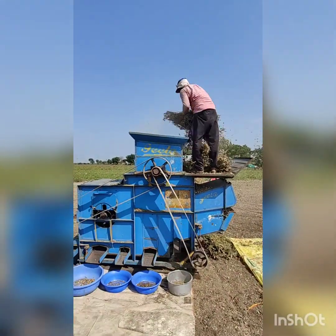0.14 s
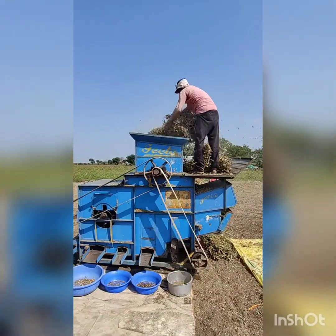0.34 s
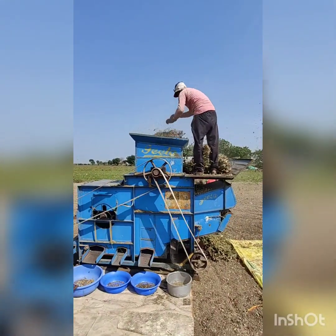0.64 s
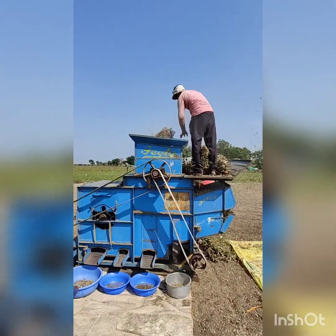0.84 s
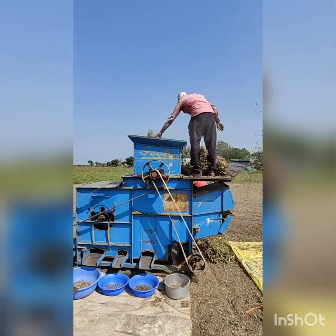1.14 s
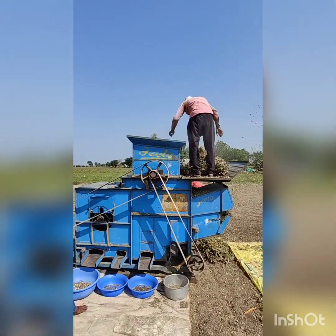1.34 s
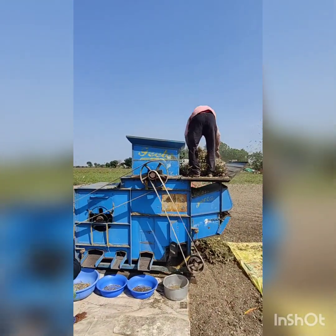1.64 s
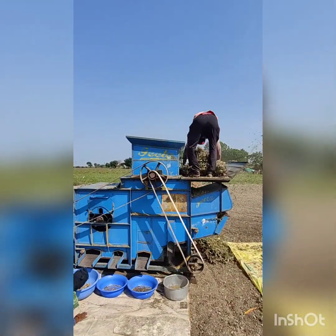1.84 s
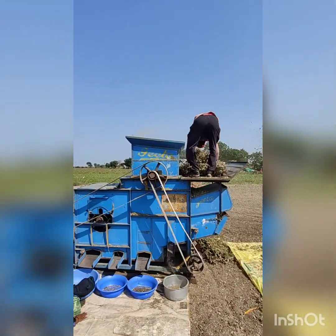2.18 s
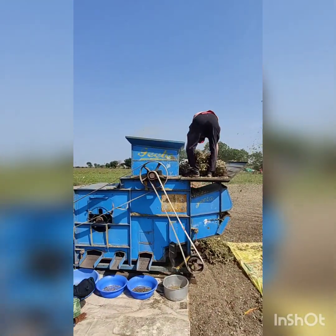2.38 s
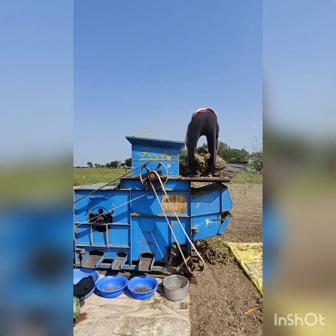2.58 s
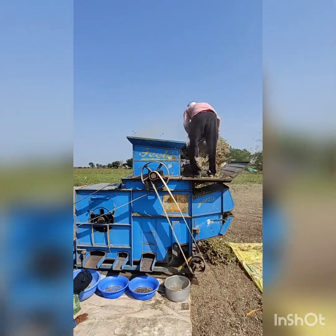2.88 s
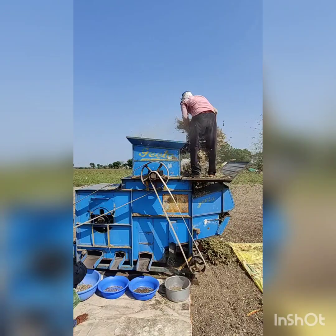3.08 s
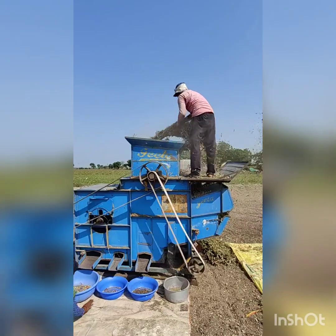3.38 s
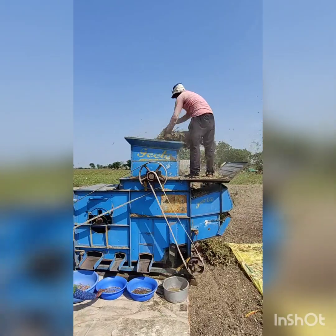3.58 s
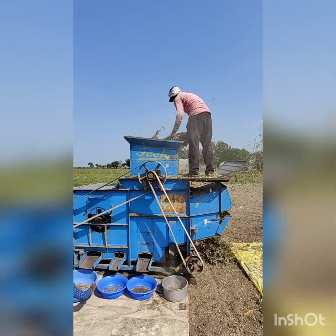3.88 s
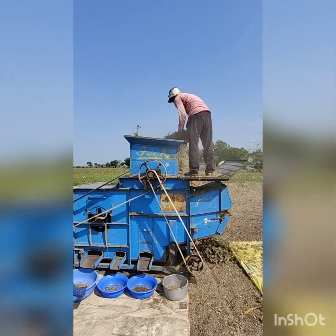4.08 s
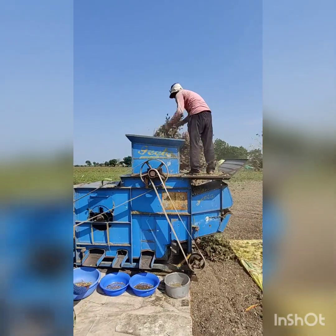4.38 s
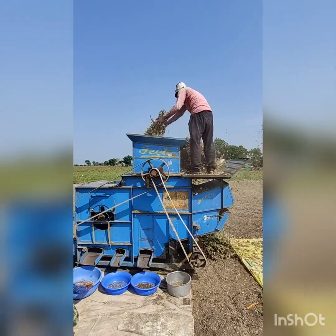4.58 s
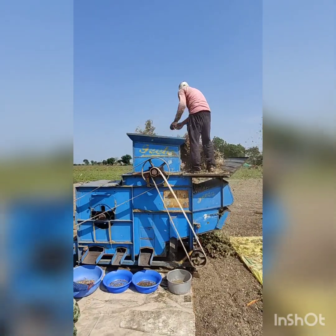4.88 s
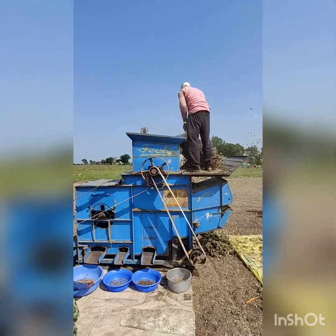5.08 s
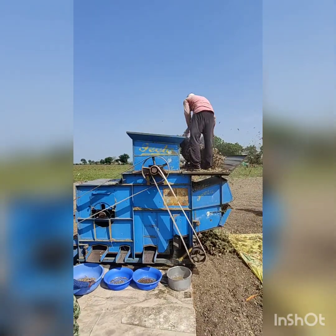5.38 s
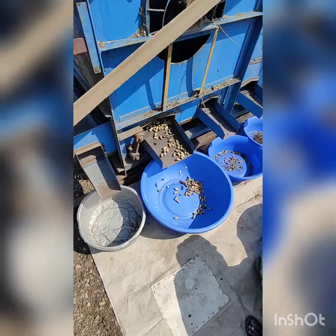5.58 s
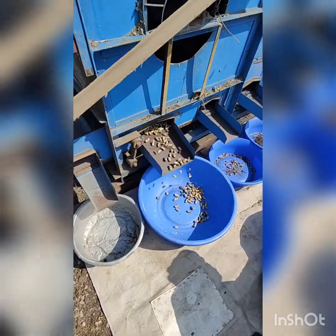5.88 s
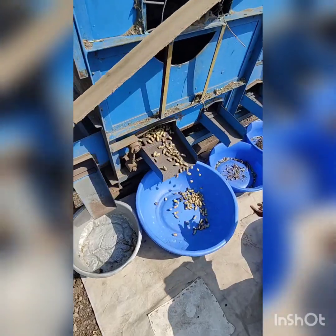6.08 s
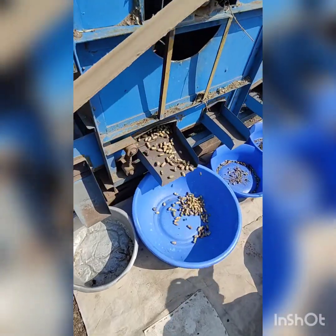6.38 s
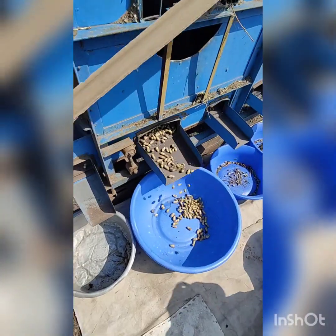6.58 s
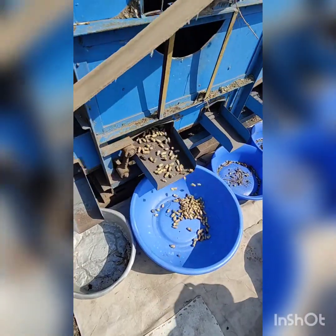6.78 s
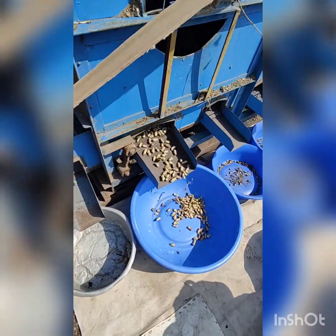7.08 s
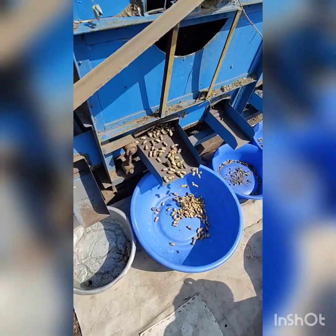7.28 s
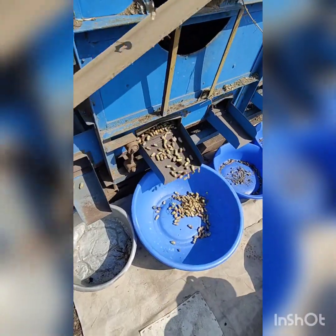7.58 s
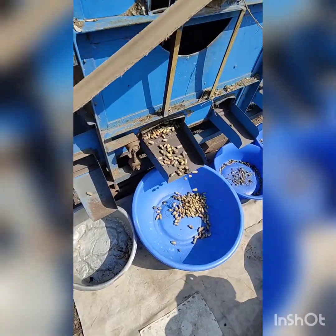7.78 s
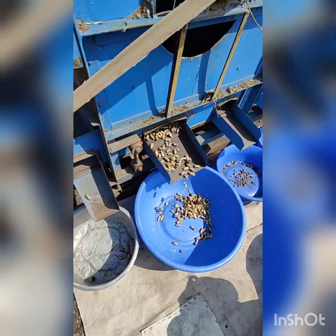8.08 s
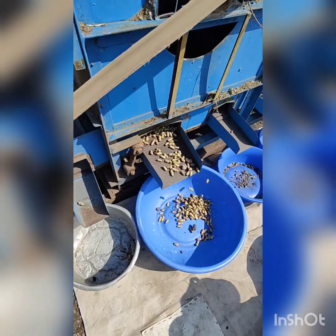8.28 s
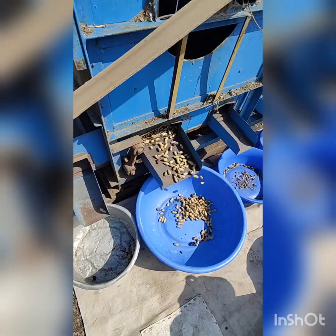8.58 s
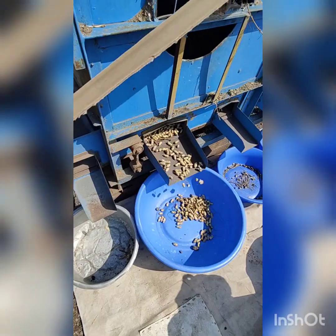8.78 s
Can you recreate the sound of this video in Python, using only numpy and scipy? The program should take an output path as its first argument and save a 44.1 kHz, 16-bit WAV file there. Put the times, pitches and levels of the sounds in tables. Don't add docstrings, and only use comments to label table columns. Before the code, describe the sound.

From 0 to 5.5 seconds a thresher is heard from afar across an open field. A slow single-cylinder engine pops evenly, nearly five times per second, each pop with a breathy gas jet and low thump. Just before each, the belt gives a tiny high chirp. Under this lie a grainy drum roar, bright chaff hiss, sieve rattle and a low fan hum swelling and fading about every two seconds. The belt joint clacks on metal roughly every 0.4 seconds, and a stronger chaff puff comes near 4.6. At 5.5 the sound cuts out for under a quarter second. From 5.7 it returns beside the chute, clearly louder and closer, with harder pops, sharper clacks and pod knocks near 6.2, 7.1 and 7.5. Wind rumbles at 5.7-6.5 and gusts strongest around 7.1-7.4. The roar thins slightly toward 8.3, while the chugging continues to the end at about 8.9.

```python
import sys
import numpy as np
from scipy import signal
from scipy.fft import rfft, irfft, next_fast_len
from scipy.io import wavfile
from scipy.ndimage import uniform_filter1d, map_coordinates

SR = 44100
rng = np.random.default_rng(int(sys.argv[2]) if len(sys.argv) > 2 else 0)


def transcribe(signal):
    frames = np.atleast_2d(signal).T
    limited = np.clip(frames, -1, 1)
    pcm = np.round(limited * 32767).astype(np.int16)
    wavfile.write(sys.argv[1], SR, pcm)


def to_linear_factor(level_db):
    exponent = np.asarray(level_db, float) / 20
    return 10 ** exponent


N = 394236

MOVE_S = 5.6
# time_s, gain_db
MUTE = [
    (5.4965, -0.5),
    (5.497, -60),
    (5.53, -90),
    (5.64, -92),
    (5.655, -45),
    (5.72, -6),
    (5.9, 0),
]

# freq_hz, level_db (per Hz)
WIND_LEVEL = [(0, -39), (0.75, -34.5), (1.2, -40.5), (1.45, -32.5), (1.8, -36), (2.05, -44), (2.5, -36.5),
              (3.25, -39), (3.5, -34), (3.95, -36), (5.5, -41.5), (5.7, -30.5), (6.2, -29.5), (6.98, -40),
              (7.1, -23.5), (7.36, -25.5), (7.52, -36), (8.94, -34)]
WIND_COLOUR = [(13, -33), (22, 2), (70, 9), (178, -2), (252, -8.5), (300, -10), (390, -37), (660, -120)]

# multiple, level_db
FAN_ORDERS = [
    (1, 2),
    (2, -7.5),
    (3, -7),
    (4, -10),
]
FAN_HZ = 45.17
BEAT_START_S, BEAT_S, BEAT_ORDER_DB = .3, 2.05, -2

# delay_s (after a firing), level_db
JOLTS = [
    (0.045, -5),
    (0.123, -14.5),
    (.178, -8.5),
]

# time_s, level_db
CROP_LOAD = [
    (0, -39.5),
    (1.5, -38),
    (2.3, -38),
    (2.7, -39),
    (5.5, -38),
    (5.7, -28.5),
    (6.5, -29.5),
    (7.3, -31),
    (8.3, -33),
    (8.94, -32.5),
]
# freq_hz, level_db (per Hz)
DRUM_ROAR = [
    [(71, -14.5), (120, -7), (264, -3.5), (449, -10), (715, -7.5), (925, -11), (1320, -11.5), (1520, -17.5), (1940, -13.5), (2760, -18.5), (4400, -20), (5600, -27), (7280, -52), (12300, -120)],
    [(71, -51), (120, -4), (225, -3), (394, -9.5), (639, -6.5), (787, -12), (1240, -13), (1470, -19.5), (1730, -16.5), (2940, -20.5), (4190, -21.5), (5600, -31.5), (7280, -61), (12300, -120)],
]
# freq_hz, level_db (per Hz)
CHAFF_HISS = [
    [(2940, -24), (5000, -15.5), (5860, -15.5), (6390, -1), (7030, 0.5), (8980, -5.5), (12300, -7), (13900, -4.5), (15200, -4.5), (15800, -12.5)],
    [(2940, -33), (5000, -13), (5830, -16), (6480, -2.5), (7100, -1), (9020, -10.5), (12300, -11.5), (13600, -6.5), (15200, -8.5), (15800, -11)],
]
HISS_UNDER_ROAR = [-4, -6.5]
# time_s, gain_db, half_width_s
CHAFF_PUFFS = [
    (1.48, 1, 0.068),
    (4.578, 4.5, 0.071),
    (6.0, 1.5, 0.12),
    (7.3, 3, 0.077),
    (8.94, 1.5, 0.26),
]

# start_s, peak_db, ring_hz
JOINT_CLACKS = [(0.0166, -20, 4630), (0.4626, -24, 2370), (0.875, -21.5, 4700), (1.3271, -17.5, 2300),
                (1.74, -18.5, 4660), (2.1954, -21.5, 2340), (2.613, -23.5, 3760), (3.0688, -25, 2440),
                (3.486, -25, 4530), (3.943, -19.5, 2230), (4.8155, -20.5, 2320), (5.2338, -19.5, 4400),
                (5.683, -10.5, 2190), (6.103, -10, 2620), (7.4274, -10.5, 4200), (7.8423, -17, 4490),
                (8.2928, -14.5, 4300), (8.7094, -15.5, 2570)]
GUARD_RING = [-12, -4.5]
LAP_START_S, LAP_S = .25, .87
# start_s, peak_db
POD_HITS = [(0.5327, -33), (0.741, -25.5), (3.237, -36), (4.204, -31), (4.282, -34), (6.2047, -22),
            (6.2951, -31), (7.1392, -20), (7.503, -23), (8.132, -29.5), (8.6844, -37), (8.8064, -29)]
POD_HZ, POD_BRIGHT_DB = 2300, -10
# freq_hz, level_db (per Hz)
CLACK_CRACK = [(900, -17), (2000, -0.5), (3000, 3.5), (4500, 2), (5700, -10), (6800, -0.5), (8500, -7),
               (12000, -14.5), (15900, -17)]
# freq_hz, level_db (per Hz)
BELT_SCUFF = [(4000, -39.5), (4800, -2.5), (5500, -0.5), (6200, 0), (7200, 3), (8500, -35)]
SLIP_LEAD = [.004, .006]
SLIP_BASE_HZ, SLIP_LEAD_S_PER_KHZ2, SLIP_LENGTH_S = 5030, .002, .009

# start_s, strength_db, slip_db, slip_pitch_hz
FAR_FIRINGS = [(0.1526, -26.5, -37, 5470), (0.3628, -27.5, -26.5, 5800), (0.5712, -27, -38, 6385),
               (0.7801, -26.5, -40, 7470), (0.9902, -27, -30, 5360), (1.1974, -25.5, -28, 6350),
               (1.406, -25, -37, 6320), (1.6147, -25.5, -30.5, 5380), (1.825, -27, -35, 6550),
               (2.0338, -27.5, -29, 6340), (2.2424, -27, -35, 7600), (2.4533, -27, -32, 6600),
               (2.6638, -26.5, -29.5, 5580), (2.873, -26, -40, 7160), (3.083, -29, -35, 7260),
               (3.2935, -28.5, -39, 6500), (3.5037, -29.5, -37, 6400), (3.7144, -27, -31, 7040),
               (3.9256, -26, -35, 6440), (4.1354, -26, -32, 6750), (4.3461, -26, -30, 5700),
               (4.5592, -27, -32, 6370), (4.7688, -28, -32, 5800), (4.9797, -26.5, -28.5, 5420),
               (5.1909, -26.5, -27.5, 6940), (5.4024, -25.5, -32.5, 5580)]
# start_s, strength_db, slip_db, slip_pitch_hz
NEAR_FIRINGS = [(5.708, -18.5, -38, 6770), (5.9164, -14.5, -32, 7390), (6.127, -18, -24, 6300),
                (6.3366, -17.5, -37, 7300), (6.547, -17.5, -33.5, 7060), (6.7565, -17.5, -23, 6900),
                (6.966, -17, -21.5, 5640), (7.175, -18, -26.5, 7500), (7.3853, -18, -28.5, 6750),
                (7.5951, -20, -25, 5560), (7.8026, -19.5, -26.5, 5550), (8.0126, -18, -30.5, 6470),
                (8.2214, -18, -28.5, 5520), (8.4298, -20, -27.5, 5700), (8.638, -18.5, -24.5, 5800),
                (8.8463, -19.5, -27, 5800)]
ALL_FIRINGS = FAR_FIRINGS + NEAR_FIRINGS
# delay_s, size
POP_ECHOES = [
    [(0, 1), (.00305, .8), (.0103, .35)],
    [(0, 1), (.00305, .45), (.0043, .72), (.0076, .55), (.0108, .25), (.0152, .3)],
]
# ring_hz, level_db, t60_s
SILENCER = [
    (241, -14.5, .07),
    (685, -16, 0.039),
    (1120, -19, .03),
]
# freq_hz, level_db (per Hz)
GAS_JET = [
    [(410, -37.5), (700, -3), (1410, -4), (1860, -1), (2820, -11), (4750, -7), (5700, -8), (7020, 0.5), (8540, -10.5), (9600, -6.5), (12100, -10.5), (13500, -8.5), (15800, -19.5)],
    [(410, -9.5), (700, -5.5), (1880, -1), (2230, -5), (3170, -11), (4510, -4), (5410, -13), (7210, 3.5), (8760, -10.5), (9730, -8.5), (12300, -11), (13500, -5.5), (15800, -11.5)],
]
# freq_hz, level_db (per Hz)
GAS_TAIL = [(400, -34), (900, 4.5), (1800, -2.5), (3000, -1.5), (5000, -14), (8000, -37.5)]
POP_LEAD_S = .002


def unit(x):
    return x / np.sqrt(np.mean(x ** 2) + 1e-20)


def curves(rows):
    s, *cols = np.transpose(rows)
    return [np.interp(np.arange(N) / SR, s, c) for c in cols]


def wobble(rate):
    return map_coordinates(rng.standard_normal(int(N * rate / SR) + 4), [np.arange(N) * rate / SR])


def coloured(x, spectrum):
    m = next_fast_len(N + 8192)
    f, db = np.transpose(spectrum)
    gain = to_linear_factor(np.interp(np.log(np.fft.rfftfreq(m, 1 / SR) + 1), np.log(f + 1), db))
    return unit(irfft(rfft(x, m) * gain, m)[:N])


def by_place(x, spectra):
    far, near = coloured(x, spectra[0]), coloured(x, spectra[1])
    return np.where(np.arange(N) < MOVE_S * SR, far, near)


def patchy(patchy_db, size=512):
    z = signal.stft(rng.standard_normal(N), nperseg=size)[2]
    field = uniform_filter1d(rng.standard_normal(z.shape), 6 * size // 512 + 1, 0)
    field = uniform_filter1d(field, 6, 1)
    return signal.istft(z * to_linear_factor(patchy_db * unit(field)), nperseg=size)[1][:N]


def add(track, s, sound):
    part = track[max(round(s * SR), 0):][:len(sound)]
    part += sound[:len(part)]


def bump(t, centre, width):
    return np.exp(-.5 * ((t - centre) / width) ** 2)


def wind():
    rumble = coloured(patchy(1.1) * to_linear_factor(2.5 * wobble(16)), WIND_COLOUR)
    return to_linear_factor(curves(WIND_LEVEL)[0]) * rumble


def fan():
    t = np.arange(N) / SR
    near = t > MOVE_S
    beat = np.abs(np.sin(np.pi * (t - BEAT_START_S) / BEAT_S))
    swell = np.where(near, to_linear_factor(-34), to_linear_factor(-42.5) * beat)
    turn = 2 * np.pi * np.cumsum(FAN_HZ * (1 + 0.004 * wobble(3.07))) / SR
    hum = np.zeros(N)
    for k, level in FAN_ORDERS:
        order_db = level + ~near * (k - 1) * BEAT_ORDER_DB
        hum += to_linear_factor(order_db + 1.1 * k * wobble(4)) * np.sin(k * turn)
    return to_linear_factor(1.5) * swell * hum


def rattle(rate, spread_db):
    hits = (rng.random(N) < rate / SR) * to_linear_factor(spread_db * np.minimum(rng.exponential(size=N), 2))
    return signal.fftconvolve(hits, to_linear_factor(-60 * np.arange(2000) / SR / 0.017))[:N]


def sieve():
    out, t = np.zeros(N), np.arange(SR // 25) / SR
    for s, *_ in ALL_FIRINGS:
        for lag, db in JOLTS:
            jolt_db = db + 4 * rng.standard_normal()
            add(out, s + lag - .02, to_linear_factor(jolt_db) * bump(t, 0.022, 0.0026))
    return out


def drum():
    t = np.arange(N) / SR
    roar_db = curves(CROP_LOAD)[0]
    hiss_db = roar_db + np.where(t > MOVE_S, HISS_UNDER_ROAR[1], HISS_UNDER_ROAR[0])
    for s, db, width in CHAFF_PUFFS:
        hiss_db = hiss_db + db * bump(t, s, width)
    shake = 0.81 * wobble(40)
    knocks = 1 + .36 * (rattle(70, 0.85) + sieve())
    roar = by_place(patchy(1.1) * to_linear_factor(1.5 * shake) * knocks, DRUM_ROAR)
    hiss = by_place(patchy(1.1) * to_linear_factor(1.4 * shake) * knocks, CHAFF_HISS)
    return to_linear_factor(roar_db + 1.48) * roar + to_linear_factor(hiss_db + 1.1) * hiss


def clacks():
    out, crack, t = np.zeros(N), np.zeros(N), np.arange(SR // 20) / SR
    strikes = [(s, db, POD_HZ, POD_BRIGHT_DB) for s, db in POD_HITS]
    for s, db, hz in JOINT_CLACKS:
        at_engine = (s - LAP_START_S) / LAP_S % 1 < .5
        strikes.append((s, db, hz, GUARD_RING[int(at_engine)]))
    rise = 1 - np.exp(-t / 0.00051)
    for s, db, hz, bright_db in strikes:
        drift = np.cumsum(rng.standard_normal((2, len(t))), axis=1) * 0.13
        plate = to_linear_factor(-5) * np.sin(2 * np.pi * hz * t + drift[0])
        guard = to_linear_factor(bright_db + 5) * np.sin(2 * np.pi * 6750 * t + drift[1])
        ping = np.sin(2 * np.pi * hz * t)
        add(out, s, to_linear_factor(db - 6.5 - 60 * t / 0.061) * rise * (plate + guard))
        add(out, s - .001, to_linear_factor(db - 8.5 - 60 * t / 0.025) * rise * ping)
        add(crack, s, to_linear_factor(db - 6.5 - 60 * t / 0.044) * rise)
    grit = to_linear_factor(2.4 * wobble(700)) * rng.standard_normal(N)
    return out + crack * coloured(grit, CLACK_CRACK)


def belt_slip():
    out, scuff, t = np.zeros(N), np.zeros(N), np.arange(SR // 20) / SR
    for s, _, db, hz in ALL_FIRINGS:
        long, rub = rng.standard_normal(2)
        drift = np.cumsum(rng.standard_normal(len(t))) * 0.13
        flutter = to_linear_factor(2.7 * np.sin(2 * np.pi * 310 * t + drift))
        lead = SLIP_LEAD[int(s > MOVE_S)] + SLIP_LEAD_S_PER_KHZ2 * ((hz - SLIP_BASE_HZ) / 1000) ** 2
        length = SLIP_LENGTH_S * to_linear_factor(1.5 * long)
        squeal = np.sin(2 * np.pi * hz * (t + 1.2 * (t - .025) ** 2) + drift)
        add(out, s - lead - .025, to_linear_factor(db) * flutter * bump(t, 0.026, length / 2.5) * squeal)
        add(scuff, s - .025, to_linear_factor(db - 7 + 2.1 * rub) * bump(t, 0.023, 0.0068))
    grit = to_linear_factor(2.4 * wobble(700)) * rng.standard_normal(N)
    return out + scuff * coloured(grit, BELT_SCUFF)


def pressure_front(t, at):
    undershoot = .45 * bump(t, at + .0008, .00035)
    returned = .8 * bump(t, at + .0021, .0004)
    return bump(t, at, .00032) - undershoot - returned


def engine():
    pops, breath, tail, t = np.zeros(N), np.zeros(N), np.zeros(N), np.arange(SR // 8) / SR
    for s, jet_db, *_ in ALL_FIRINGS:
        near = int(s > MOVE_S)
        chance = rng.standard_normal(8)
        pop_db = jet_db - .4
        pop = np.zeros(len(t))
        for (lag, size), c in zip(POP_ECHOES[near], chance):
            pop += size * to_linear_factor(c) * pressure_front(t, POP_LEAD_S + lag)
        thump = to_linear_factor(-7.5 - 2 * near) * bump(t, .03, .006) * np.sin(2 * np.pi * 70 * (t - .032))
        shut = bump(t, 0.0804, 0.0059) * np.sin(2 * np.pi * 235 * (t - .074))
        shut = to_linear_factor(-14 + 2.5 * chance[6]) * shut
        add(pops, s - POP_LEAD_S, to_linear_factor(pop_db + 9.5) * (pop + thump + shut))
        for (hz, db, t60), c in zip(SILENCER, chance[3:]):
            add(pops, s, to_linear_factor(pop_db + 9 + db + 2 * c - 60 * t / t60) * np.sin(2 * np.pi * hz * t))
        jet = np.where(t < .0095, bump(t, 0.008, 0.0027), bump(t, 0.011, 0.0042))
        valve_puff = to_linear_factor(-16 + 1.8 * chance[7]) * bump(t, 0.0753, 0.0065)
        add(breath, s, to_linear_factor(jet_db + 4.5) * (jet + valve_puff))
        add(tail, s, to_linear_factor(jet_db - 6) * bump(t, 0.013, 0.0073))
    turbulence = to_linear_factor(2.6 * wobble(900) + 1.85 * wobble(300)) * patchy(2.9, size=128)
    gas = by_place(turbulence, GAS_JET)
    gas = unit(gas - .45 * np.roll(gas, round(.00195 * SR)))
    return pops + breath * gas + tail * coloured(rng.standard_normal(N), GAS_TAIL)


def scene():
    echo = np.zeros(SR // 10)
    echo[[0, 410, 950, 1900]] = 0.68, 0.066, 0.047, 0.04
    chug = signal.fftconvolve(engine(), echo)[:N]
    return (wind() + fan() + drum() + clacks() + belt_slip() + chug)[None]


def band_limit(x):
    return signal.sosfilt(signal.butter(12, 16990, fs=SR, output="sos"), x)


def record(dry):
    x = signal.sosfilt(signal.butter(2, 32, "high", fs=SR, output="sos"), dry)
    x = x * to_linear_factor(curves(MUTE)[0])
    top_hz, edge_hz = 15850, 120
    m = next_fast_len(N)
    slope = np.clip((top_hz + edge_hz / 2 - np.fft.rfftfreq(m, 1 / SR)) / edge_hz, 0, 1) ** 2
    mix = irfft(rfft(x, m) * slope, m)[:, :N]
    return band_limit(mix)


dry = scene()
out = record(dry)
transcribe(out)
```